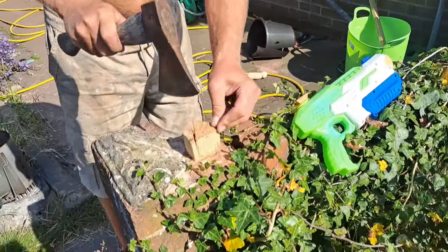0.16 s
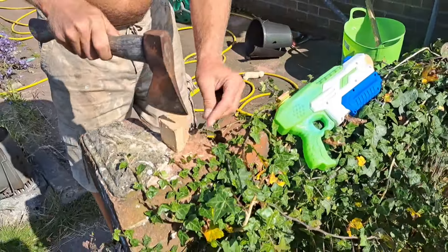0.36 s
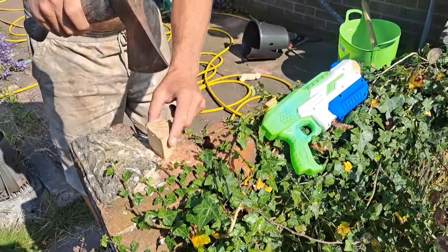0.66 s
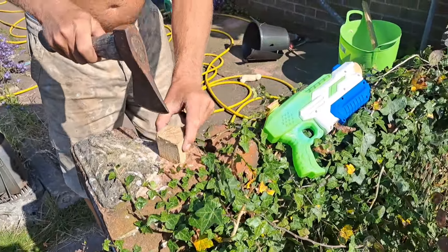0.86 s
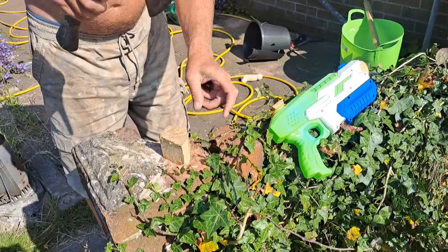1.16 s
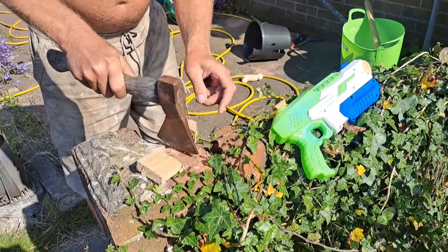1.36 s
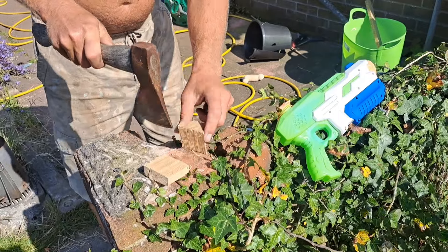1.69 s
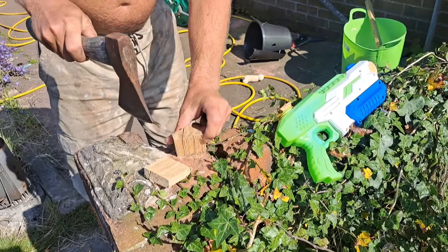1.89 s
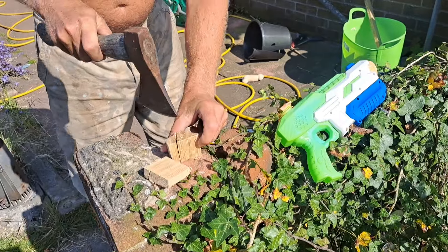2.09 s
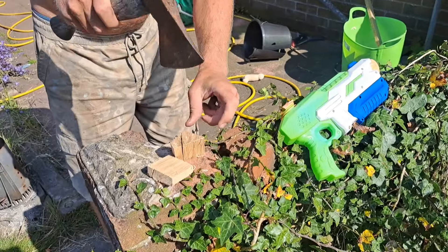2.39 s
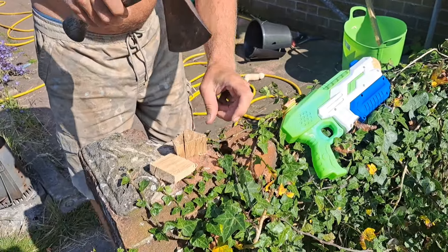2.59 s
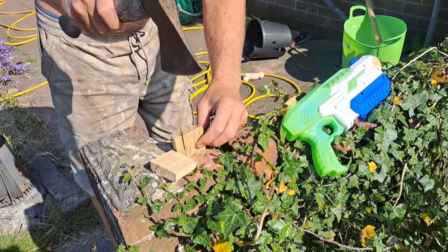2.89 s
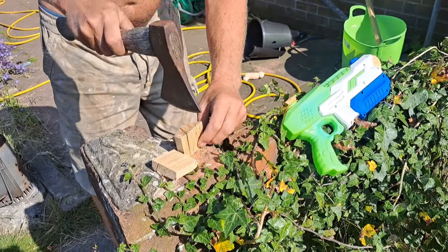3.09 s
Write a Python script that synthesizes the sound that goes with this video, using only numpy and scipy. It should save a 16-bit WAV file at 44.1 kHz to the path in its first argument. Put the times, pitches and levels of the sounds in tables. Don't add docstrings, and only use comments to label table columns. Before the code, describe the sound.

In a windy garden, close to a stereo microphone, light wooden taps precede a single dry hatchet crack and landing thud; a piece drops, fingers scuff, a distant bird trills, and gusts rumble low.

```python
import sys
import numpy as np
from scipy import signal
from scipy.fft import rfft, irfft
from scipy.io import wavfile

SR = 44100
rng = np.random.default_rng(int(sys.argv[2]) if len(sys.argv) > 2 else 0)


def transcribe(signal):
    frames = np.atleast_2d(signal).T
    limited = np.clip(frames, -1, 1)
    pcm = np.round(limited * 32767).astype(np.int16)
    wavfile.write(sys.argv[1], SR, pcm)


def to_linear_factor(level_db):
    exponent = np.asarray(level_db, float) / 20
    return 10 ** exponent


N = 143325

# t/s, level/dB, softness f/Hz
CRACK_SLIPS = [(.0004, -8, 7000), (.0011, -7, 3000), (.0019, -9, 2600), (.0028, -5, 2400)]
# t/s, level/dB, softness f/Hz
LANDING_SLIPS = [(.0011, -7, 1800), (.0058, -16.5, 900), (0.0122, -14.5, 3000), (.022, -23.5, 1500)]
# f/Hz, level/dB, t60/s
BLOCK_MODES = [(370, -23.5, 0.0096), (800, -12, .01), (1170, -9.5, 0.012), (1624, -9, .008),
               (2050, -13.5, .008), (2587, -10.5, 0.012), (3050, -7, .006), (3600, -1, 0.0066),
               (4250, -3.5, 0.0065), (5530, -10, 0.017), (6380, -2, .006), (7750, -6, .0035),
               (9880, -15.5, .004), (12430, -10, .003)]
# f/Hz, level/dB, t60/s
THUD_MODES = [(385, -5, .03), (580, -3.5, 0.049), (630, -5, .025), (1010, -1.5, 0.017), (1250, 0.5, .012),
              (1444, -2.5, 0.015), (1658, -9.5, .016), (2003, -9.5, .014), (2515, -5, .02),
              (3110, -2.5, .011), (3960, -8.5, .007), (4470, -16.5, .006), (6300, -21, 0.019)]
# t/s, level/dB, t60/s
TEARS = [
    (1.326, -27.5, 0.074),
    (1.335, -19, 0.023),
    (1.346, -39, 0.33),
    (1.365, -22.5, 0.08),
    (1.373, -34, 0.26),
    (1.504, -46.5, 0.13),
]
# f/Hz, level/dB per Hz
TEAR_COLOUR = [(180, -32.5), (300, -8), (4370, -13), (5080, -3), (8940, -19), (14000, -18), (16000, -30.5)]
# f/Hz, level/dB per Hz
DEBRIS_COLOUR = [(180, -7.5), (300, -9), (4170, -24.5), (5320, -26.5), (9000, -37), (11700, -53),
                 (19800, -120)]
# delay t/s, level/dB
ECHOES = [(.0042, -16), (.011, -28), (.017, -22.5), (.029, -30.5)]
# f/Hz, level/dB, t60/s, swell t/s
STEEL = [(5181, -35, .2, .004), (9771, -31, .25, .02), (15730, -44, .14, .035), (7615, -45, .08, .004)]
# t/s, peak level/dB, pitch f/Hz, t60/s, overtone level/dB
TAPS = [(.0797, -44, 3800, .005, -6), (.205, -47, 1380, .02, -8), (.232, -54, 1200, .012, -10),
        (.2603, -33, 1420, .016, 4), (.271, -46, 1300, .012, 0), (.3835, -45, 3700, .006, 0),
        (.672, -48, 900, .012, -6), (1.5022, -27, 1150, .007, -6), (1.5405, -46, 1100, .012, 8),
        (1.706, -53.5, 1300, .01, 0), (1.857, -39, 1330, .009, -2), (2.097, -46, 1278, .008, -2),
        (2.9255, -41, 2900, .005, -10), (2.964, -50, 1540, .006, 6)]
# f/pitch [ratio], level/dB
TAP_MODES = [(.43, -8), (.65, -4), (1.0, 0), (1.4, -7), (2.0, -13), (2.5, -17)]
# t/s, length/s, level/dB, centre f/Hz
SCUFFS = [(.0, 0.077, -67, 10100), (0.017, 0.0018, -59, 9500), (0.023, 0.084, -73.5, 5000),
          (.062, 0.049, -63, 3600), (0.079, 0.0049, -59, 11000), (0.144, .005, -64.5, 12000),
          (.168, 0.027, -63, 8800), (.195, 0.035, -63.5, 6850), (.19, .03, -66, 3650),
          (.262, 0.034, -62.5, 3200), (0.219, 0.072, -68, 8600), (0.416, 0.13, -66, 2270),
          (0.413, 0.18, -69.5, 12300), (0.723, 0.17, -69, 6760), (.73, 0.14, -70.5, 13100),
          (1.40, .03, -60, 7000), (1.494, 0.0058, -60.5, 14320), (1.68, 0.049, -67.5, 6890),
          (1.79, .035, -67, 6500), (1.875, 0.054, -63, 10500), (1.875, .03, -67, 13800),
          (1.917, 0.0044, -62, 11000), (1.917, .009, -60, 6000), (1.934, 0.01, -55.5, 7000),
          (1.93, 0.0098, -59.5, 10900), (1.932, 0.0078, -62, 3300), (1.966, 0.02, -61, 6000),
          (1.966, .018, -59, 11680), (2.206, 0.0037, -62.5, 11930), (2.926, 0.056, -60.5, 10560),
          (2.931, 0.021, -57, 2670), (2.948, 0.038, -58.5, 2900), (3, 0.069, -59.5, 10600),
          (2.977, 0.08, -61, 13000), (2.979, 0.084, -63.5, 6160)]
# t/s, level/dB
TRILL = [(1.047, -62), (1.104, -57), (1.164, -56), (1.223, -59), (1.286, -60), (1.468, -58), (1.49, -63),
         (1.556, -60), (1.624, -64), (1.699, -67), (1.773, -68)]
# t/s, level/dB, left-right level/dB
GUSTS = [(0, -54.5, -3), (.35, -63.5, -9.5), (.66, -51, -11), (.88, -48, 1), (1.03, -36, 0),
         (1.12, -41.5, -4), (1.3, -53.5, -14), (1.42, -46.5, 4), (1.9, -53.5, -3), (2.5, -61.5, -16),
         (2.75, -47.5, -6), (2.93, -38.5, 8), (3.25, -51, -15)]
# crest t/s, peak level/dB, left-right level/dB, swing f/Hz
BUFFETS = [(0.104, -29.5, -1.5, 90), (0.141, -35.5, -4, 78), (0.246, -37, -5, 90), (0.474, -36, -8, 100),
           (0.613, -39.5, -15.5, 86), (0.695, -37, -3, 69.4), (0.785, -39, -14, 149),
           (0.827, -28.5, -9, 138), (0.897, -29, -4, 127), (0.953, -24, -4.5, 143), (1.069, -19, 0.5, 112),
           (1.145, -18.5, -1.5, 139.4), (1.195, -30.5, -9.5, 141.5), (1.392, -25.5, -2.5, 126.8),
           (1.44, -28.5, -3.5, 90), (1.475, -37.5, -13, 118), (1.512, -25.5, -2.5, 109.6),
           (1.597, -38.5, -2.5, 98), (1.663, -34, 2, 130), (1.754, -34, -2, 130), (1.813, -32, -1.5, 105),
           (1.871, -32.5, -0.5, 130), (2.337, -31.5, 0, 140), (2.636, -30.5, -7.5, 141.6),
           (2.679, -30, -5.5, 90.8), (2.727, -34, -5, 90), (2.765, -28.5, 3.5, 91.7),
           (2.82, -34.5, 0.5, 100), (2.854, -40.5, 10.5, 127.7), (2.894, -28.5, 7, 110),
           (2.927, -15, 0.5, 95), (2.965, -39, 2, 130), (3.005, -24.5, 6, 127.3), (3.05, -30.5, 4, 122),
           (3.111, -24.5, -7, 152), (3.173, -30, -5, 106)]
# f/Hz, level/dB per Hz
WIND_COLOUR = [(12, -29.5), (20, -20.5), (54, 5), (129, -3), (424, -19), (586, -31), (1500, -48),
               (1950, -59.5), (3300, -120)]
# t/s, level/dB
HUSH = [(0, -66.5), (.9, -69), (1.22, -64), (1.7, -68), (2.6, -71), (3.2, -61)]
# f/Hz, level/dB per Hz
AIR_COLOUR = [(180, -25), (300, -4.5), (2100, -17.5), (3030, -21), (7320, -23), (8940, -35), (12100, -28),
              (16000, -38.5)]

BITE_S, CRACK_S, LANDING_S = 1.3198, 1.3247, 1.3622


def rms_one(x):
    return x / np.sqrt(np.mean(x ** 2) + 1e-20)


def in_time(rows):
    s, *columns = np.transpose(rows)
    t = np.arange(N) / SR
    return [np.interp(t, s, column) for column in columns]


def drift(rate_hz, channels=1):
    r = np.exp(-2 * np.pi * rate_hz / SR)
    noise = rng.standard_normal((channels, N + SR))
    settled = signal.lfilter([1], [1, -2 * r, r * r], noise)[:, SR:]
    return rms_one(settled)


def colour(x, points):
    hz, db = np.transpose(points)
    hz = np.r_[hz[0] / 3, hz, hz[-1] * 2]
    db = np.r_[db[0] - 25, db, db[-1] - 25]
    log_f = np.log(np.fft.rfftfreq(x.shape[-1], 1 / SR) + 1)
    gain_db = np.interp(log_f, np.log(hz), db)
    return rms_one(irfft(rfft(x) * to_linear_factor(gain_db), x.shape[-1]))


def pair(alike, size):
    alike = np.clip(alike, 0, 1)
    mid, side = rng.standard_normal((2, size))
    return np.sqrt(1 + alike) * mid + np.sqrt(1 - alike) * side * [[1], [-1]]


def ring(clicks, hz, t60):
    r, w = to_linear_factor(-60 / (t60 * SR)), 2 * np.pi * hz / SR
    return signal.lfilter([0, np.sin(w)], [1, -2 * r * np.cos(w), r * r], clicks + 1e-18)


def add(out, s, x):
    i = int(max(s, 0) * SR)
    out[..., i:i + x.shape[-1]] += x[..., :N - i]


def late(x):
    i = np.arange(x.shape[1])
    return np.array([x[0], np.interp(i - .00009 * SR, i, x[1])])


def blow(out, s, db, soft_hz, slips, modes):
    clicks = np.zeros(SR // 2)
    for after_s, slip_db, hz in [(0, 0.0052, soft_hz)] + list(slips):
        r = np.exp(-2 * np.pi * hz / SR)
        i = int(max(after_s, 0) * SR)
        clicks[i:i + 200] += to_linear_factor(slip_db) * (1 - r) * r ** np.arange(200)
    sound = np.zeros((2, SR // 2))
    for k, (hz, level_db, t60) in enumerate(modes):
        skew = rng.uniform(-1, 1, (2, 2))
        for port in range(2):
            gain = to_linear_factor(level_db + 2.5 * skew[port, 0]) * (-1) ** k
            sound[port] += gain * ring(clicks, hz * (1 + .015 * skew[port, 1]), t60)
    add(out, s, to_linear_factor(db) * sound / 3)


def tearing(out):
    t = np.arange(SR // 2) / SR
    for s, db, t60 in TEARS:
        snaps_db = 2.5 * np.minimum(rng.exponential(1, len(t)), 5)
        grain = to_linear_factor(snaps_db + 2 * drift(90)[0, :len(t)])
        spectrum = TEAR_COLOUR if s < LANDING_S else DEBRIS_COLOUR
        noise = colour(pair(0.23, len(t)) * grain, spectrum)
        fade = to_linear_factor(db - 60 * t / t60) * np.minimum(t / 0.0026, 1)
        add(out, s, fade * noise)


def hatchet():
    out = np.zeros((2, N))
    blow(out, CRACK_S, 3.7, 9000, CRACK_SLIPS, BLOCK_MODES)
    blow(out, LANDING_S, 0, 17000, LANDING_SLIPS, THUD_MODES)
    bite = colour(pair(.6, 240), TEAR_COLOUR) * np.linspace(.15, 1, 240)
    add(out, BITE_S, to_linear_factor(-31) * bite)
    tearing(out)
    dull = signal.lfilter([.55], [1, -.45], out)
    for k, (s, db) in enumerate(ECHOES):
        add(out, s, to_linear_factor(db) * dull[::(-1) ** k].copy())
    return late(out)


def steel():
    out, t = np.zeros((2, N)), np.arange(SR // 2) / SR
    port_phase = np.array([[0], [.6]])
    lift_s = TAPS[0][0] - .01
    for hz, db, t60, swell_s in STEEL:
        envelope = to_linear_factor(db - 60 * t / t60) * np.minimum(t / swell_s, 1)
        tone = envelope * np.sin(2 * np.pi * hz * t + port_phase)
        add(out, LANDING_S, tone)
        add(out, lift_s, to_linear_factor(-35) * tone * (swell_s > .01))
    return out


def taps():
    out, t = np.zeros((2, N)), np.arange(3000) / SR
    for s, db, hz, t60, bright_db in TAPS:
        rattle = .12 * to_linear_factor(-60 * t / .006) + to_linear_factor(-28 - 60 * t / .07)
        contact = pair(.85, len(t)) * rattle
        contact[:, 0] = 1
        soften = signal.butter(2, min(hz * 1.8, 15000), fs=SR, output="sos")
        contact = signal.sosfilt(soften, contact)
        knock = 0
        for ratio, mode_db in TAP_MODES:
            gain = to_linear_factor(mode_db + bright_db * (ratio > 1.2))
            knock = knock + gain * ring(contact, hz * ratio, max(t60, .002))
        add(out, s, to_linear_factor(db - 1) * knock / np.abs(knock).max() * to_linear_factor([[-.8], [.8]]))
    return late(out)


def scuffs():
    out = np.zeros((2, N))
    grain_db = 3.2 * np.minimum(rng.exponential(1, N), 5)
    grit = pair(.7, N) * to_linear_factor(grain_db + 2.5 * drift(150))
    for s, length_s, db, hz in SCUFFS:
        i, n = int(max(s, 0) * SR), int(length_s * SR)
        burst = 0
        for width, share in [(.11, 1), (.55, .2)]:
            edges = [hz / (1 + width), min(hz * (1 + width / 2), .45 * SR)]
            band = signal.butter(1, edges, "band", fs=SR, output="sos")
            burst = burst + share * signal.sosfilt(band, grit[:, i:i + n])
        t = np.arange(burst.shape[1]) / n
        envelope = np.minimum(np.minimum(t / 0.15, (1 - t) / 0.68), 1)
        add(out, s, to_linear_factor(db) * rms_one(burst) * envelope)
    return out


def bird():
    out = np.zeros(N)
    size = int(.022 * SR)
    pitch_hz = np.linspace(3650, 2750, size)
    note = np.hanning(size) * np.sin(2 * np.pi * np.cumsum(pitch_hz) / SR)
    for s, db in TRILL:
        add(out, s, to_linear_factor(db - 4) * note)
    scatter = rng.standard_normal((2, 3000)) * to_linear_factor(-26 - np.arange(3000) / 100)
    scatter[:, 0] = 1
    return signal.fftconvolve(out[None], scatter, axes=1)[:, :N]


def gusts():
    db, pan_db = in_time(GUSTS)
    lumps = to_linear_factor(2.5 * drift(13, channels=2))
    rumble = rms_one(colour(pair(.1, N), WIND_COLOUR) * lumps)
    return to_linear_factor(db + 4 + pan_db * [[.5], [-.5]]) * rumble


def buffets():
    out, t = np.zeros((2, N)), np.arange(-2000, 2000) / SR
    ports = np.array([[.5], [-.5]])
    chances = rng.uniform(-1, 1, (len(BUFFETS), 4))
    for (s, peak_db, pan_db, hz), chance in zip(BUFFETS, chances):
        swing = 2 * np.pi * hz * t * (1 + 8 * t * chance[0])
        port_skew = 1.1 * ports * (1 + chance[2])
        turn = swing + np.pi * chance[1] + port_skew
        eddy = np.cos(turn) + to_linear_factor(-7) * np.cos(2.1 * turn + np.pi * chance[3])
        envelope = np.exp(-(t * hz / 0.9) ** 2)
        add(out, s + t[0], to_linear_factor(peak_db - 6 + pan_db * ports) * eddy * envelope)
    return out


def leaves():
    hush_db, = in_time(HUSH)
    flutter_db = .7 * drift(6)
    return to_linear_factor(hush_db + 3 + flutter_db) * colour(pair(0.17, N), AIR_COLOUR)


def scene():
    return hatchet() + steel() + taps() + scuffs() + bird() + gusts() + buffets() + leaves()


def low_pass(x):
    return signal.sosfilt(signal.butter(12, 16690, fs=SR, output="sos"), x)


def record(dry):
    mix = 1.676 * np.tanh(dry / 1.267)
    return low_pass(mix)


dry = scene()
out = record(dry)
transcribe(out)
```